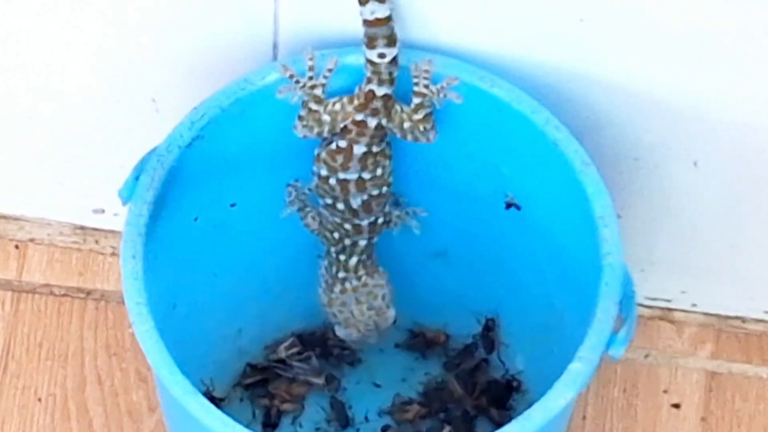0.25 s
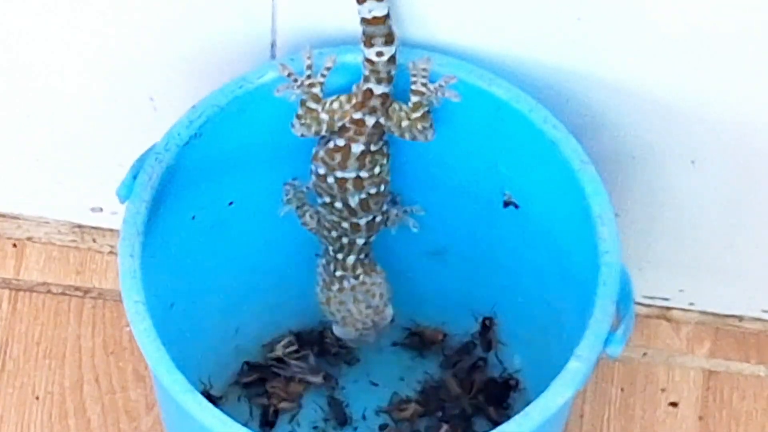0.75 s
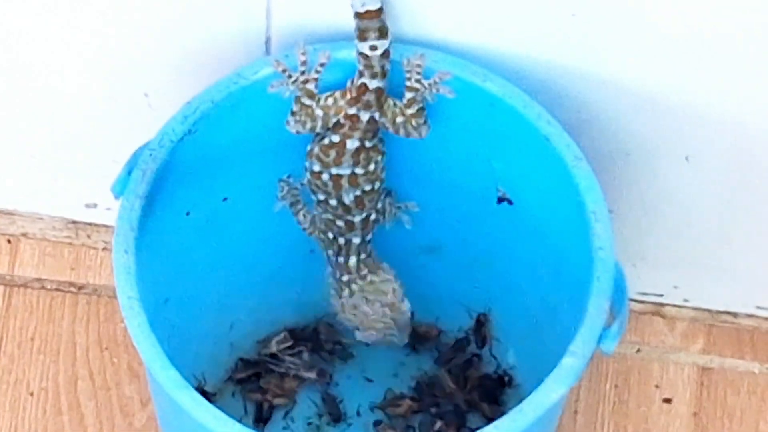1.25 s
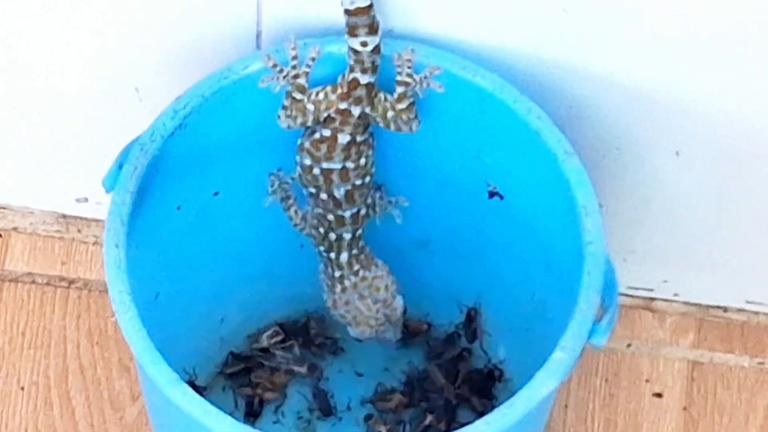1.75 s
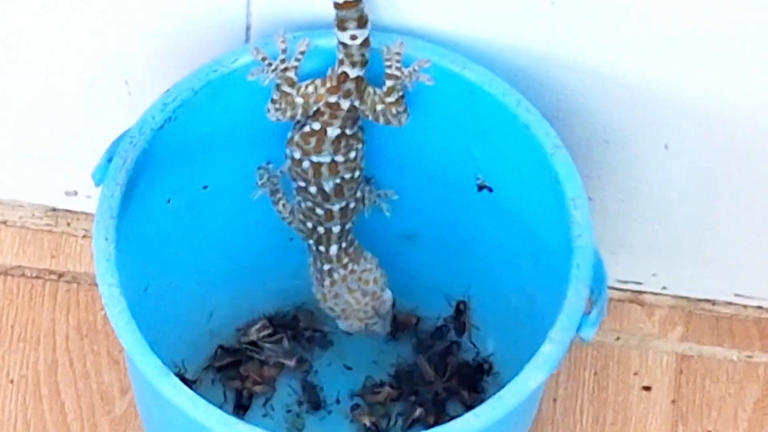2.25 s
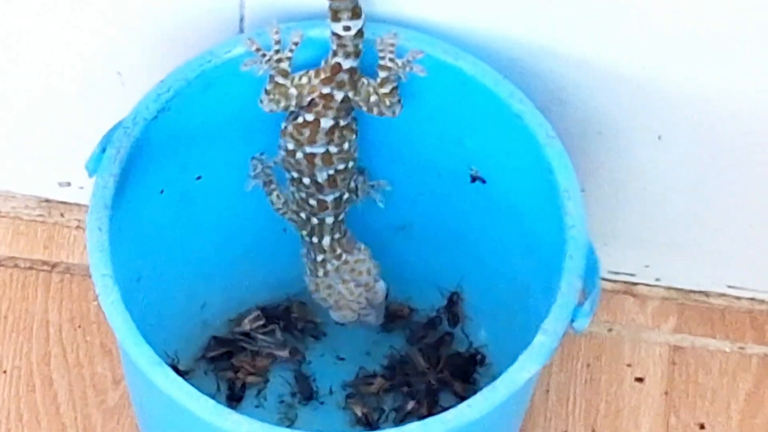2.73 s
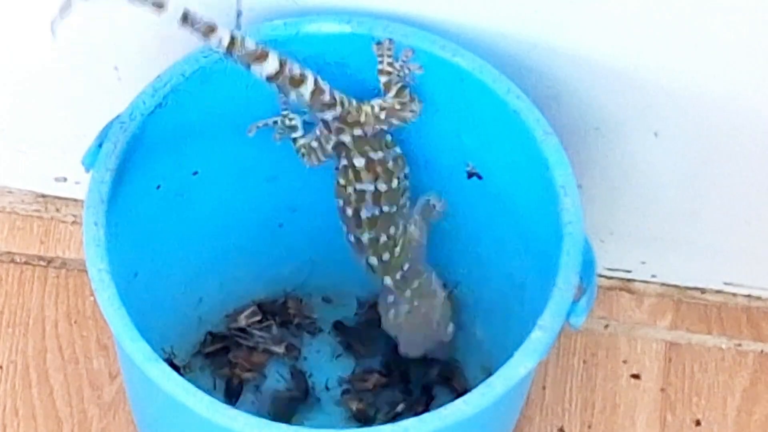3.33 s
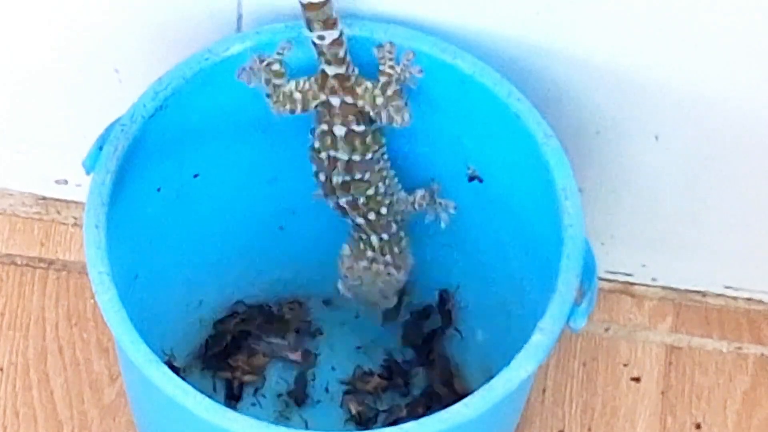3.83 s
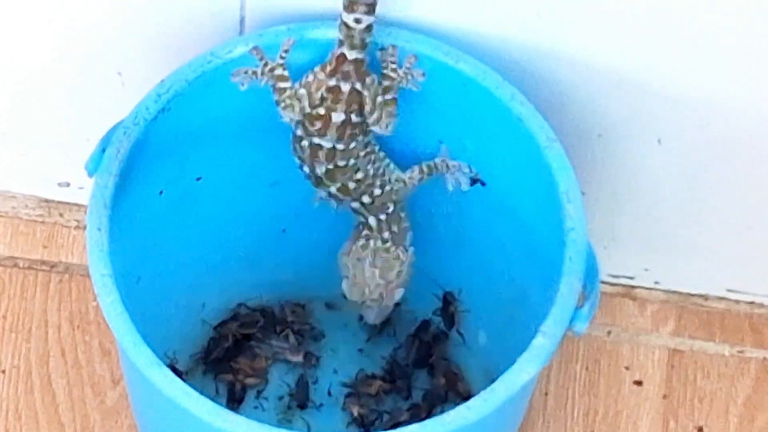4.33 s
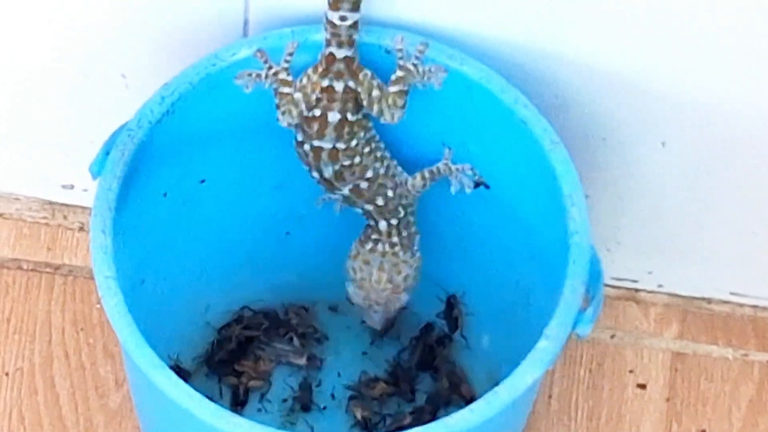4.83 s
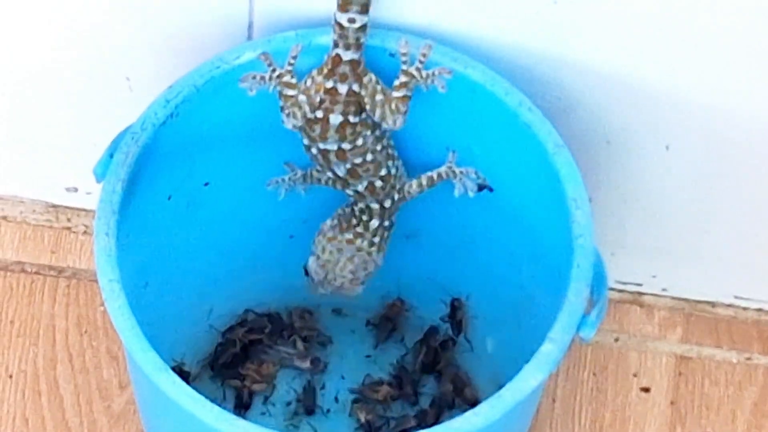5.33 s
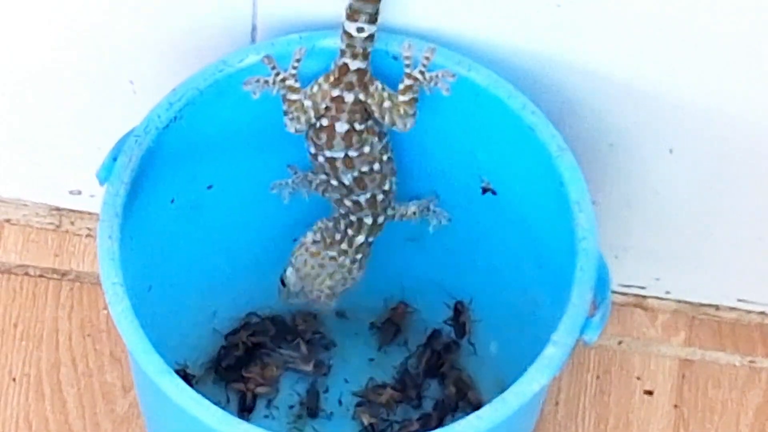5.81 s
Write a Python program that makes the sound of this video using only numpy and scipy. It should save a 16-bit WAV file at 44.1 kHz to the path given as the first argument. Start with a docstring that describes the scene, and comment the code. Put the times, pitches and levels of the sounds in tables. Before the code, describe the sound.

A gecko close to the microphone rattles out a loud run of about eight short, raspy croaks, ringing in a small hard-walled room. A pause of nearly three seconds leaves only faint hiss, crickets and a distant frog outside. Then comes a second run of about ten croaks, growing longer and a little higher. A few soft rustles and handling bumps follow near the end.

```python
"""A dying echo, then a gecko rattling two bursts of short croaks in a small hard room.
Each croak is a train of larynx pulses ringing throat and mouth. Outside, bush crickets scrape their
wings and a far frog calls. Underneath: night hiss, mains hum, a swaying rumble with soft handling bumps,
a few rustles and knocks, one faint squeak. A phone close to the gecko clips the loudest peaks."""
import sys
import numpy as np
from scipy import signal
from scipy.fft import rfft, irfft
from scipy.io import wavfile
from scipy.ndimage import uniform_filter1d

SR = 44100
rng = np.random.default_rng(int(sys.argv[2]) if len(sys.argv) > 2 else 0)


def transcribe(signal):
    """Save signal, clipped to [-1, 1], as a 16-bit WAV file at the path in sys.argv[1]."""
    frames = np.atleast_2d(signal).T
    limited = np.clip(frames, -1, 1)
    pcm = np.round(limited * 32767).astype(np.int16)
    wavfile.write(sys.argv[1], SR, pcm)


N = 267543

# Gecko croaks: start_s, length_s, top_pulse_hz, crest_share (of length), onset_share and
# end_share (of top_pulse_hz), level_db, fade_db, mouth_hz, throat_db
CROAK_EVENTS = [(0.024, 0.024, 262.9, 0.49, .62, 0.58, -2.5, 2.5, 2310, -1.5),
                (0.1355, 0.0235, 245.9, 0.43, .72, 0.69, -2, 4, 2304, -0.8),
                (0.245, 0.022, 397, 0.74, 0.49, 0.78, 0.5, 1, 2290, -5),
                (0.3528, 0.025, 364.5, 0.71, 0.6, 0.65, -2, 0.33, 2330, -4),
                (0.4499, 0.032, 392.2, 0.32, 0.51, 0.83, -4, 4.9, 2322, -2.5),
                (0.548, 0.029, 414, .3, 0.52, 0.79, -4, 5.36, 2360, -2),
                (0.6432, 0.0344, 391.2, 0.11, 0.89, 0.85, -3.5, 4.5, 2340, -0.5),
                (0.7314, 0.051, 379.4, 0.035, 0.94, .67, -4.5, 23, 2344, 0.5),
                (3.4882, 0.025, 248.3, 0.47, 0.67, .4, -2.5, 2, 2265, -6),
                (3.5907, 0.027, 307, 0.38, 0.68, 0.69, -1.5, 7.5, 2180, -9),
                (3.6986, 0.03, 313.7, 0.53, 0.91, 0.61, 0.3, 8.2, 2205, -10.5),
                (3.8, 0.027, 394.3, 0.19, 0.92, 0.73, 1, 4.5, 2144, -13.5),
                (3.8915, 0.036, 452.5, .4, .63, 0.48, -3, 4.5, 2154, -10.5),
                (3.99, 0.04, 466.4, 0.56, .68, 0.68, -2.5, 6, 2160, -10.5),
                (4.0775, 0.062, 436.3, .45, .72, 0.63, -3.5, 7, 2194, -9),
                (4.1777, 0.057, 436.2, 0.32, 0.552, 0.64, -3.5, 6, 2157, -7.5),
                (4.2653, 0.056, 459.5, .55, 0.53, .75, -4, 6.5, 2290, -5),
                (4.3625, 0.093, 425.5, .25, 0.46, .65, -4, 18.3, 2355, -2.5)]
# Throat resonances: centre_hz, width_hz, gain_db
THROAT_MODES = [(422, 450, -12.5), (727.6, 440, -3.5), (1237, 626, 3.5)]
# Room echo bands: centre_hz, width_hz, t60_s, gain_db
ROOM_BANDS = [(320, 51, 0.45, 1), (571.4, 98, 0.54, 8), (739, 35, 0.47, 4), (950, 310, .4, 0),
              (1669, 220, 0.55, 1), (2500, 2200, 0.37, -7), (4770, 4800, 0.29, 3), (8500, 8100, 0.5, 3)]
# More room echo as the gecko turns away: time_s, gain_db
TURN_AWAY = [(1, 2.5), (3, 3)]
# Night hiss spectrum: frequency_hz, gain_db
HISS_SPECTRUM = [(76, -31), (130, -6.5), (220, -4.5), (330, -10.5), (520, -8), (930, -11), (1270, -5),
                 (1650, -13), (2750, -6.5), (3600, -12.5), (4100, -23), (5600, -28.5), (6700, -17),
                 (8200, -19.5), (10300, -20), (16000, -36)]
# Soft low handling bumps on the microphone: centre_s, half_length_s, level_db
HANDLING_BUMPS = [(3.501, .04, -57), (4.337, 0.12, -49.5), (5.19, .08, -43.5), (5.64, 0.098, -46.5),
                  (5.822, 0.12, -50), (6.008, .06, -33.5)]
# Cricket phrases: start_s, end_s, level_db
NEAR_PHRASES = [(0.0, .4, -59), (.5, 1.3, -56), (1.5, 2.08, -55), (2.245, 2.71, -55), (3.26, 4.17, -56.5),
                (4.32, 5.03, -56.5), (5.68, 6.1, -56)]
FAR_PHRASES = [(.6, 1.3, -61.5), (1.53, 2.1, -64), (2.52, 3.11, -63), (3.4, 4.1, -65), (4.75, 5.6, -62.5)]
# Wing resonances: centre_hz, width_hz, gain_db, delay_s
NEAR_WING_MODES = [(7210, 450, 0.5, 0.012), (7600, 500, -6.5, 0), (8110, 360, 3.5, .02),
                   (14800, 1500, -13, .01)]
FAR_WING_MODES = [(8400, 550, -3, 0), (8830, 610, -0.5, .01)]
# Frog calls: start_s, length_s, level_db
FROG_CALLS = [(0.964, 0.05, -60), (1.613, 0.12, -62.5), (2.363, 0.12, -61.5), (3.083, 0.12, -62),
              (4.677, 0.07, -59.5), (5.427, 0.062, -59.5)]
# Rustles: start_s, length_s, centre_hz, width_hz, level_db
RUSTLE_EVENTS = [(1.161, 0.084, 1450, 1544, -57.5), (1.758, 0.065, 14200, 3510, -61.5),
                 (5.068, 0.11, 689, 940, -58), (5.135, 0.11, 464, 865, -51.5), (5.623, 0.12, 880, 860, -54),
                 (5.673, 0.09, 14400, 3000, -56.5)]
# Squeak: start_s, length_s, first_hz, last_hz, peak_db
SQUEAK_GLIDE = (1.7, .08, 4080, 4320, -68)
# Knocks: start_s, centre_hz, width_hz, peak_db
KNOCK_EVENTS = [(3.035, 850, 500, -47.5), (5.194, 790, 590, -41), (5.997, 252, 144, -34)]

TIME_S = np.arange(N) / SR


def undb(db):
    return 10 ** (np.asarray(db) / 20)


def level(x, rms_db):
    return x * undb(rms_db) / np.sqrt(np.mean(x ** 2))


def ring(x, hz, width_hz, passes=1):
    """Unity-gain resonance; more passes give a slower swell and steeper flanks."""
    b, a = signal.iirpeak(hz, hz / width_hz, fs=SR)
    for _ in range(passes):
        x = signal.lfilter(b, a, x)
    return x


def add(out, start_s, x):
    i = int(start_s * SR)
    out[i:i + len(x)] += x[:N - i]


def walk(rate_hz):
    """Smoothed random steps, spread near 1."""
    hold = int(SR / rate_hz)
    steps = np.repeat(rng.standard_normal(N // hold + 1), hold)
    return 0.89 * uniform_filter1d(uniform_filter1d(steps, hold), hold)[:N]


def gate(rows, rise_s, t60_s):
    """Gain that opens for each (start_s, end_s, level_db), then decays."""
    return sum(undb(db - 60 * np.maximum(TIME_S - end_s, 0) / t60_s)
               * np.clip((TIME_S - start_s) / rise_s, 0, 1) for start_s, end_s, db in rows)


def arc(progress, crest, start, end, fall):
    """From start to 0 at the crest, then to end along the curve fall."""
    after_crest = np.abs(progress - crest) / (1 - crest)
    return np.where(progress < crest, start * (1 - progress / crest) ** 2, end * fall(after_crest))


def sagging(x):
    """Eases off, slides, settles."""
    return np.sin(np.pi / 2 * x) ** 2


def fading(x):
    """Holds, then drops."""
    return x ** 1.4


def tract(drive, mouth_hz, throat_db=0, lowest_db=0, dark_db=0):
    """Throat and mouth resonances; lowest_db lifts the first throat mode, dark_db the first two."""
    soft = signal.sosfilt(signal.butter(4, 4200, fs=SR, output="sos"), drive)  # larynx closes softly
    throat = 0
    for k, (hz, width_hz, db) in enumerate(THROAT_MODES):
        gain = undb(db + throat_db - 1.5 + lowest_db * (k == 0) + dark_db * (k < 2))
        throat += (-1) ** k * ring(gain * soft, hz, width_hz, passes=2)
    mouth = ring(soft, mouth_hz, width_hz=1178, passes=4)
    mouth_edge = undb(-29) * ring(soft, hz=2900, width_hz=2200, passes=2)
    voice = mouth + mouth_edge - throat
    return voice - ring(voice, hz=1430, width_hz=200)  # a side pocket of the throat absorbs this band


def dying_echo(t60_s=0.22):
    """Echo of an earlier croak: decaying noise in the voice's colour."""
    echo = tract(rng.standard_normal(N), mouth_hz=2300)
    return level(echo, rms_db=-27.5) * undb(-60 * TIME_S / t60_s)


def night_hiss():
    """Coloured noise, level drifting slightly."""
    hz, db = np.transpose(HISS_SPECTRUM)
    bins_hz = np.fft.rfftfreq(N, 1 / SR)
    colour = undb(np.interp(np.log(bins_hz + 1), np.log(hz), db))
    noise = undb(walk(4)) * rng.standard_normal(N)
    return level(irfft(rfft(noise) * colour, N), rms_db=-59.5)


def mains_hum():
    """One tone, wavering in pitch and level."""
    pitch_hz = 100 + 0.84 * walk(2.3)
    tone = np.sin(2 * np.pi * np.cumsum(pitch_hz) / SR)
    return level(tone * undb(2 * walk(5)), rms_db=-63)


def microphone_rumble(bed_db=-63, sway_db=4):
    """Soft low handling bumps on the microphone, over a swaying rumble."""
    rumble = level(ring(rng.standard_normal(N), hz=21, width_hz=41, passes=2), rms_db=0)
    bumps = sum(undb(db) * np.exp(-((TIME_S - centre_s) / half_s) ** 2)
                for centre_s, half_s, db in HANDLING_BUMPS)
    return rumble * (undb(bed_db + sway_db * walk(5)) + bumps)


def cricket(phrases, wing_modes, stroke_hz, depth):
    """Wing strokes scrape the file and ring the wing, phrase by phrase."""
    phase = np.cumsum(stroke_hz * (1 + 0.024 * walk(3.7))) / SR % 1
    stroke = 1 - depth * (1 - np.exp(-((phase - .4) / .25) ** 2))
    scrape = stroke * undb(2.5 * walk(68)) * rng.standard_normal(N)
    wing = np.zeros(N)
    for hz, width_hz, db, delay_s in wing_modes:
        mode = ring(scrape, hz, width_hz, passes=2) / np.sqrt(width_hz)
        wing += undb(db) * np.roll(mode, int(delay_s * SR))
    return gate(phrases, rise_s=.025, t60_s=.22) * level(wing, rms_db=0)


def larynx(phase, gain, noise, roughness=0.032):
    """One pulse per cycle, uneven in timing and force, plus faint breath."""
    samples, beats = np.arange(len(phase)), np.arange(int(phase[-1]) + 1)
    jitter = 0.25 * roughness * noise[beats] * (beats > 0)
    position = np.interp(beats + jitter, phase, samples)
    force = np.interp(position, samples, gain) * undb(10 * roughness * noise[64 + beats])
    drive = np.zeros(len(noise))
    np.add.at(drive, position.astype(int), force * (1 - position % 1))  # split over two samples
    np.add.at(drive, position.astype(int) + 1, force * (position % 1))
    drive[samples] += 0.4 * roughness * gain * noise[128 + samples]
    return drive


def gecko(voice_db=0.5, rasp_db=-44, mean_swell_db_per_s=220):
    """Larynx pulses ring the tract; rate and level crest, then sag as the voice darkens."""
    out, size = np.zeros(N), 8192
    click = signal.unit_impulse(512)
    for start_s, length_s, top_hz, crest, onset, end, db, fade_db, mouth_hz, throat_db in CROAK_EVENTS:
        n = int(length_s * SR)
        noise = rng.standard_normal(size)
        progress = np.minimum(np.arange(size) / SR / length_s, 1)
        pulse_hz = top_hz * (1 + arc(progress[:n], crest, onset - 1, end - 1, sagging))
        phase = np.cumsum(pulse_hz) / SR
        swell_db = mean_swell_db_per_s * crest * length_s
        gain = undb(db + arc(progress[:n], crest, -swell_db, -fade_db, fading))
        dark_db = arc(progress, crest, 0, 0.85 * fade_db, fading)  # low modes fade less
        lowest_db = 4 * (pulse_hz.mean() - 300) / 100  # fast croaks favour the lowest mode
        voice = tract(larynx(phase, gain, noise), mouth_hz, throat_db, lowest_db, dark_db)
        click_peak = np.abs(tract(click, mouth_hz, throat_db, lowest_db)).max()
        add(out, start_s, voice / click_peak)
        puffs = gain * (0.41 + np.exp(-(phase % 1) / 0.9)) * noise[-n:]  # air hissing past the jaws
        add(out, start_s, undb(rasp_db) * ring(puffs, hz=6400, width_hz=9000, passes=2))
    return undb(voice_db) * out


def room(direct, send_db=-6.5, build_s=.007, near_wall_db=6.5, near_wall_s=.015):
    """Direct sound plus dense hard-wall echoes, fading by band; the nearest wall answers first."""
    t = np.arange(SR // 2) / SR
    tail = sum(undb(db - 60 * t / t60_s) * ring(rng.standard_normal(len(t)), hz, width_hz)
               for hz, width_hz, t60_s, db in ROOM_BANDS)
    tail *= 1 - np.exp(-(t / build_s) ** 2)
    tail *= undb(near_wall_db * np.exp(-t / near_wall_s))
    mid_hz, span_hz = 1700, 2500
    mid_gain = np.sqrt(np.sum(ring(tail, mid_hz, span_hz) ** 2) * SR / (np.pi * span_hz))
    send = direct * undb(send_db + np.interp(TIME_S, *np.transpose(TURN_AWAY)))
    return direct + signal.fftconvolve(send, tail / mid_gain)[:N]


def frog(throb_hz=28):
    """Short throbbing calls, smeared by distance."""
    throb = 1 + 0.15 * np.sin(2 * np.pi * throb_hz * TIME_S)
    call = ring(throb * rng.standard_normal(N), hz=2830, width_hz=260, passes=2)
    spans = [(start_s, start_s + length_s, db) for start_s, length_s, db in FROG_CALLS]
    return gate(spans, rise_s=0.012, t60_s=0.44) * level(call, rms_db=0)


def rustles(grain_db=4.7, grain_samples=64):
    """Bursts of grainy band noise."""
    out = np.zeros(N)
    for start_s, length_s, hz, width_hz, db in RUSTLE_EVENTS:
        n = int(length_s * SR)
        noise, flicker = rng.standard_normal((2, 8192))
        grains = noise[:n] * undb(grain_db * np.repeat(flicker, grain_samples)[:n])
        add(out, start_s, level(ring(grains, hz, width_hz, passes=2), db) * np.hanning(n) ** .5)
    return out


def squeak():
    """One faint rising tone."""
    out = np.zeros(N)
    start_s, length_s, first_hz, last_hz, peak_db = SQUEAK_GLIDE
    pitch_hz = np.linspace(first_hz, last_hz, int(length_s * SR))
    tone = np.sin(2 * np.pi * np.cumsum(pitch_hz) / SR)
    add(out, start_s, undb(peak_db) * np.hanning(len(tone)) ** .5 * tone)
    return out


def knocks():
    """Small dull knocks: an impulse rings one damped resonance."""
    out = np.zeros(N)
    for start_s, hz, width_hz, peak_db in KNOCK_EVENTS:
        knock = ring(signal.unit_impulse(2048), hz, width_hz, passes=2)
        add(out, start_s, undb(peak_db) * knock / np.abs(knock).max())
    return out


def scene():
    """Mono mix; only the gecko feeds the room."""
    crickets = cricket(NEAR_PHRASES, NEAR_WING_MODES, stroke_hz=17.2, depth=0.53)
    crickets += cricket(FAR_PHRASES, FAR_WING_MODES, stroke_hz=25, depth=0.28)
    animals = room(gecko()) + dying_echo() + crickets + frog()
    bed = night_hiss() + mains_hum() + microphone_rumble()
    return (animals + bed + rustles() + squeak() + knocks())[None]


def record(dry, clip_db=-.1, cutoff_hz=15600):
    """The phone clips the tallest peaks and cuts the top treble."""
    clipped = np.clip(dry, -undb(clip_db), undb(clip_db))
    return signal.sosfilt(signal.ellip(12, .2, 90, cutoff_hz, fs=SR, output="sos"), clipped)


dry = scene()
out = record(dry)
transcribe(out)
```